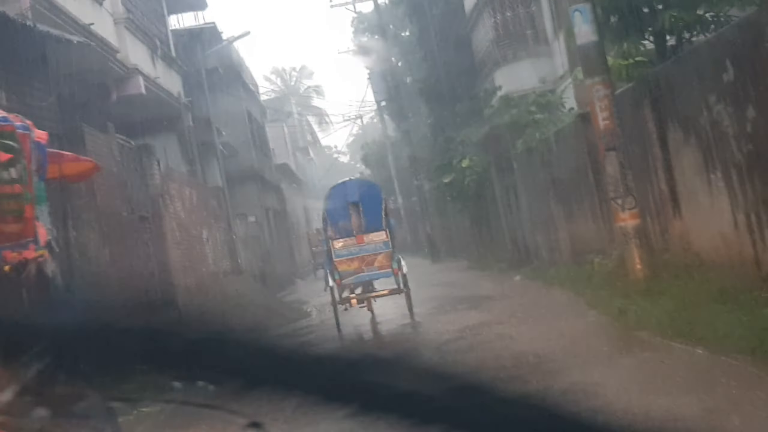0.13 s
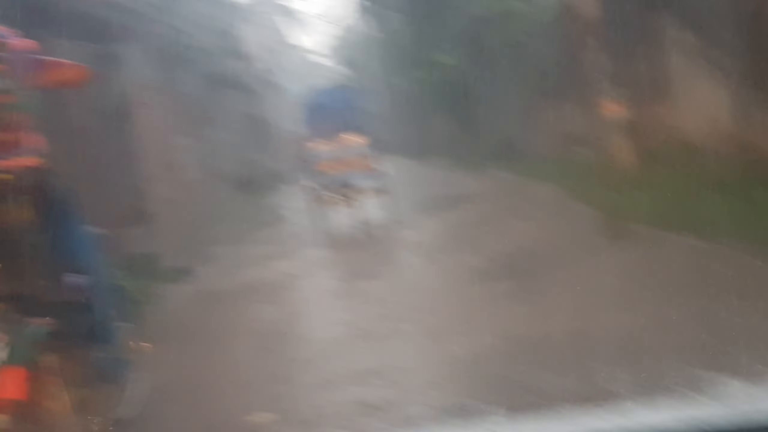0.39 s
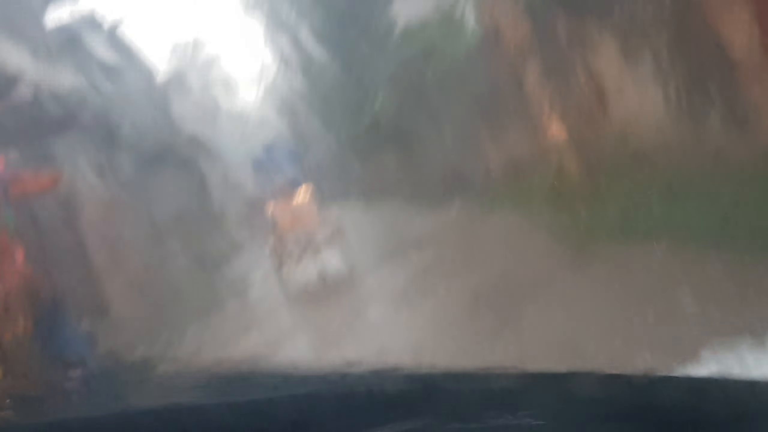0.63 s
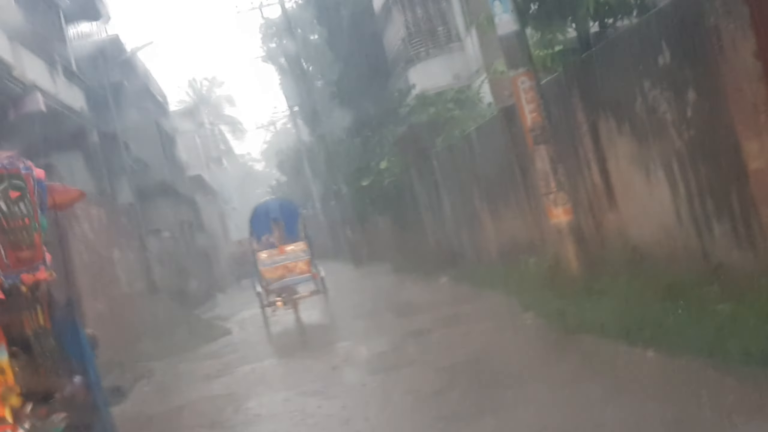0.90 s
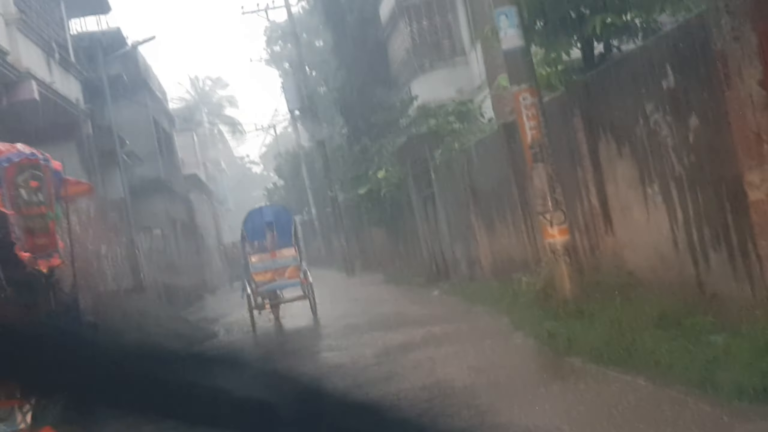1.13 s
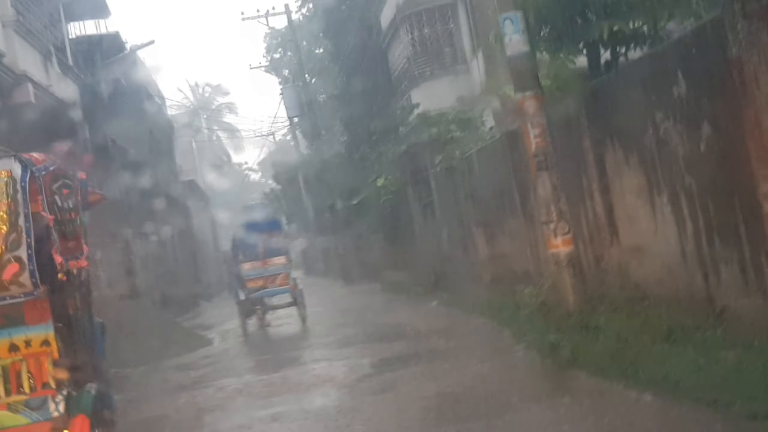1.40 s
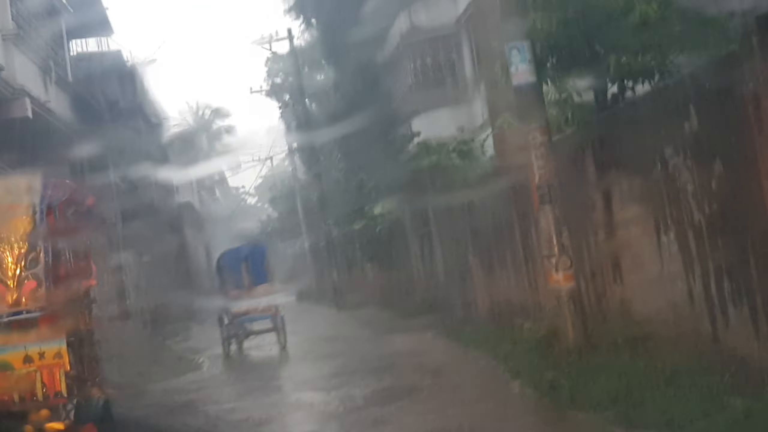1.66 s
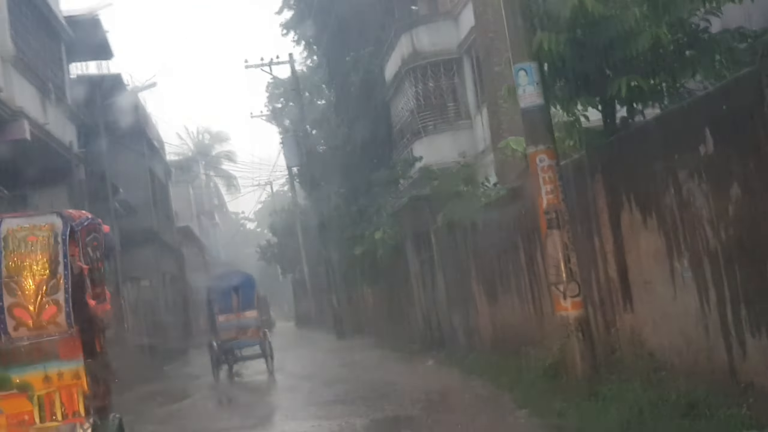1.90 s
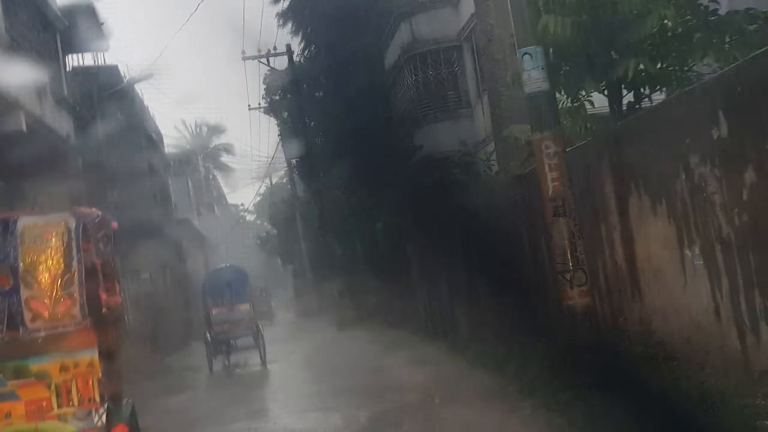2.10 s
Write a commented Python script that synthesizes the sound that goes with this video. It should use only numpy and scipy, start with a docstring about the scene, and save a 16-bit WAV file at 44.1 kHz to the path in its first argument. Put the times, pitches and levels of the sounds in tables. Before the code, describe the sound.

Heard from inside a slowly moving car, heavy rain hisses and patters on the glass and drums on the roof throughout. Deep road rumble swells with bumps. Wipers knock softly about every half second, at first, once with a sharp crack midway. The rain is heaviest just before that, with bright single drops and splashes; then it eases as a low wavering hum and louder road boom come in. The left side is duller, the right brighter.

```python
"""Heavy rain on a slowly rolling car, heard from inside by two unlike microphones.
Throughout: filtered noise and random clicks patter on the glass and drum on the roof; noise-fed modes boom
with the road. Bumps, single drops, splashes and roof strikes fall at set times; from 0.46 s the wipers knock
as they turn (struck panel modes), once with a sharp crack at 3.516 s. The rain peaks between 2 and 3.5 s; a low
gliding sine hums from 3.7 s as the car pulls away, and the road booms louder as the rain eases."""
import sys
import numpy as np
from scipy import signal
from scipy.fft import rfft, irfft, next_fast_len
from scipy.io import wavfile

SR = 44100
rng = np.random.default_rng(int(sys.argv[2]) if len(sys.argv) > 2 else 0)


def master(y):
    """Save y as 16-bit WAV."""
    cut = np.clip(np.atleast_2d(y).T, -1, 1)
    pcm = np.round(cut * 32767)  # scale
    wavfile.write(sys.argv[1], SR, pcm.astype(np.int16))


def ratio_of_db(decibels):
    """Turn decibels (scalar or array-like) into linear amplitude factors; 0 dB maps to 1."""
    return 10 ** (np.asarray(decibels, float) / 20)


N = 302526
SIZE = next_fast_len(N + 8192)
HZ = np.arange(SIZE // 2 + 1) * SR / SIZE + 1e-3

# spectrum of drops on glass: f/Hz, relative level per Hz/dB
GLASS_SPECTRUM = [(410, -20), (700, -7.5), (757, -6.5), (885, -9.5), (1010, -6), (1340, -5.5), (1550, -2.5),
                  (2970, -12), (5700, -13), (6500, -22.5), (7300, -25), (8000, -32), (9000, -28),
                  (12400, -23), (14500, -28), (15700, -34.5)]
# roof panel resonances: f/Hz, width/Hz, level/dB
ROOF_MODES = [(338, 340, 0), (493, 200, 0), (754, 59, 6.5), (950, 290, 0), (1620, 170, -1)]
# left microphone against the right one: f/Hz, level/dB
LEFT_COLOUR = [(50, 0.), (150, -1.5), (300, -1.5), (620, -4), (760, -2.5), (1200, -5), (1700, -9),
               (3000, -7), (5400, -14), (6800, -10.5), (8500, 0), (10500, -5), (12200, -9), (15500, -6)]


def rms_one(x):
    """Scales to unit power."""
    return x / np.sqrt(np.mean(x ** 2) + 1e-20)


def in_time(rows):
    """Interpolates the columns of a curve table to one value per sample."""
    s, *columns = np.transpose(rows)
    return [np.interp(np.arange(N) / SR, s, c) for c in columns]


def at_hz(points):
    """Reads a spectrum table at every frequency, linear in log f."""
    hz, value = np.array(points).T
    return np.interp(np.log(HZ), np.log(hz), value)


def causal(db):
    """Minimum-phase response with this level in dB: nothing sounds before its cause."""
    cepstrum = irfft(np.maximum(db, -90) * np.log(10) / 20, SIZE)
    cepstrum[1:SIZE // 2] *= 2
    cepstrum[SIZE // 2 + 1:] = 0
    return np.exp(rfft(cepstrum))


def drift(corner_hz):
    """Slow random curve of rms 1: noise through two equal poles, at SR / 20."""
    r = np.exp(-40 * np.pi * corner_hz / SR)
    noise = rng.standard_normal(N // 20 + 2002)
    slow = signal.lfilter([1], [1, -2 * r, r * r], noise)[2000:]
    return np.interp(np.arange(N) / 20, np.arange(len(slow)), rms_one(slow))


def resonance(x, hz, width_hz):
    """One resonance with gain 1 on top."""
    r = np.exp(-np.pi * width_hz / SR)
    poles = [1, -2 * r * np.cos(2 * np.pi * hz / SR), r * r]
    return signal.lfilter(np.array([1, 0, -1]) * (1 - r * r) / 2, poles, x)


def wavering_sine(hz, level_db, waver_db, waver_hz, wobble):
    """A near sine whose strength and pitch waver a little."""
    level = np.sqrt(2) * ratio_of_db(level_db + waver_db * drift(waver_hz))
    phase = 2 * np.pi * np.cumsum(hz * (1 + wobble * drift(8.02))) / SR
    return level * np.sin(phase)


def panel_db():
    """The roof panel lifts a few frequencies."""
    return sum(db / (1 + (2 * (HZ - hz) / width_hz) ** 2) for hz, width_hz, db in ROOF_MODES)


def both_ears(shared, left, right, colour_db):
    """Long waves reach both microphones alike, short ones by unrelated paths; power 1 at the right one."""
    # left-right likeness: f/Hz, likeness
    likeness = [(60, 0.97), (130, 0.94), (290, 0.77), (640, 0.52), (1410, -0.06), (3100, 0.06),
                (6820, -0.01), (15000, 0.0)]
    alike = np.clip(at_hz(likeness), 0, 1)
    common = np.sqrt(alike) * rfft(shared, SIZE)
    colour = causal(colour_db)
    pair = []
    for own in (left, right):
        spectrum = common + np.sqrt(1 - alike) * rfft(own, SIZE)
        pair.append(irfft(colour * spectrum, SIZE)[:N])
    return np.array(pair) / np.std(pair[1])


def drops(per_s, spread_db, clump_db):
    """Drops land at random, in clumps, a few much larger than the rest."""
    sizes = ratio_of_db(spread_db * np.minimum(rng.exponential(1, N), 3.6)) * rng.choice([-1, 1], N)
    chance = per_s * ratio_of_db(clump_db * drift(14.0)) / SR
    return sizes * (rng.random(N) < chance)


def cabin(clicks, t60_s, direct_db, pan_db, count):
    """Drops at several places from left to right: a tick and a short cloud of reflections on each path."""
    t = np.arange(2048) / SR
    place = rng.integers(0, count, N)
    paths = 0      # becomes shared, left, right
    for k, side in enumerate(np.linspace(-1, 1, count)):
        clouds = rng.standard_normal((3, len(t))) * ratio_of_db(-60 * t / t60_s)
        clouds = clouds / np.sqrt(np.sum(clouds ** 2, axis=1, keepdims=True))
        tick_db = direct_db + pan_db * side * np.array([0, 1, -1])
        clouds[[0, 1, 2], rng.integers(0, 40, 3)] += ratio_of_db(tick_db)
        paths = paths + signal.oaconvolve((clicks * (place == k))[None], clouds, axes=1)[:, :N]
    return paths


def road_shake():
    """Each bump swells and fades over the steady shake; the deep pitch glides from bump to bump."""
    # lane roughness as steady boom: t/s, level/dB
    road_table = [(0.0, -32.5), (0.6, -31.5), (1.1, -37), (2.2, -40), (2.6, -34), (3.4, -29.5), (3.9, -31),
                  (4.4, -28.5), (5.2, -30.5), (5.7, -27.5), (6.4, -27), (6.86, -33)]
    # bumps in the lane: t/s, deep boom/dB, upper boom/dB, leading deep mode/Hz
    bump_table = [(0.05, -28, -26, 49.3), (0.33, -26, -30, 43), (0.65, -19, -29, 47.14),
                  (1.2, -29, -36, 46.1), (1.76, -27, -37, 46.7), (1.87, -23, -36, 49.6),
                  (2.06, -26, -24, 51.6), (2.2, -28, -40, 51.2), (2.42, -39, -22, 59.9),
                  (2.51, -33, -19, 60.8), (2.85, -33, -43, 44.75), (3.041, -42, -22, 43.6),
                  (3.1, -24.5, -39, 44), (3.2, -15.5, -67, 46.65), (3.4, -35, -25, 45.5),
                  (3.52, -18, -19, 52.8), (3.681, -15.5, -25, 53.04), (3.86, -26, -42, 57.2),
                  (4.18, -21.5, -42, 49.3), (4.6, -21, -36, 47.83), (4.72, -24.5, -28, 51),
                  (4.81, -28, -27, 50.6), (5.13, -24, -31, 39.7), (5.33, -22, -36, 48.8),
                  (5.44, -32, -22.5, 49.3), (5.52, -34, -18.5, 55.4), (5.791, -32, -27, 61.05),
                  (5.88, -40, -41, 61.5), (6.06, -27, -50, 60), (6.459, -29, -17, 55.74),
                  (6.67, -26, -25, 49.7), (6.731, -37, -23, 53.84)]
    rise_s, fall_s = 0.03, 0.03      # amplitude time constants
    steady_deep_db = -2.5            # against the upper boom
    steady_db, = in_time(road_table)
    s, deep_db, upper_db, hz = np.transpose(bump_table)
    t = np.arange(0, N, 40) / SR
    late_s = t[:, None] - s
    swell = np.exp(-2 * np.abs(late_s) / np.where(late_s < 0, rise_s, fall_s))
    levels_db = []
    for base_db, bump_db in ((steady_db + steady_deep_db, deep_db), (steady_db, upper_db)):
        power = np.interp(np.arange(N) / SR, t, swell @ ratio_of_db(2 * bump_db))
        levels_db.append(10 * np.log10(ratio_of_db(2 * base_db) + power))
    return *levels_db, np.interp(np.arange(N) / SR, s, hz)


def boom(modes, level_db):
    """Road shake, as noise, excites low modes of body and cabin."""
    rings = 0
    for hz, width_hz, db in modes:
        ring = resonance(rng.standard_normal(N), hz, 2 * width_hz)
        ring = rms_one(resonance(ring, hz, width_hz))
        rings = rings + ratio_of_db(db + 1.2 * drift(2.3)) * ring
    return ratio_of_db(level_db) * rms_one(rings)


def road():
    """Deep and upper modes boom, one deep mode leading at a time; opposite parts left and right."""
    # modes of body and cabin: f/Hz, width/Hz, relative level/dB
    deep_modes = [(34, 5.6, -10), (53.4, 17, -6.5)]
    # higher modes: f/Hz, width/Hz, relative level/dB
    upper_modes = [(74.5, 15.3, 2), (92.8, 35.5, -3.5), (114.4, 59, -5.5)]
    deep_db, upper_db, deep_hz = road_shake()
    deep = wavering_sine(deep_hz, deep_db - 3.5, waver_db=-1.0, waver_hz=6.3, wobble=0.0834)
    deep = deep + boom(deep_modes, deep_db + 0.5)
    # the boom differs a little across the cabin
    unlike = boom(deep_modes, deep_db - 28) + boom(upper_modes, upper_db - 23.0)
    return deep + boom(upper_modes, upper_db) + unlike * [[1], [-1]]


def pull_away_hum():
    """A low wavering sine that fades in and glides about as the car pulls away."""
    # hum: t/s, f/Hz, level/dB
    hum_table = [(3.9, 79.5, -35), (4.2, 97.4, -33.5), (4.54, 109.2, -24.5), (4.9, 102.7, -35.5),
                 (5.12, 108.6, -30.5), (5.25, 91, -22), (5.5, 72.47, -42), (6.08, 71.9, -34),
                 (6.4, 84.55, -31), (6.7, 85.9, -32), (6.86, 78.7, -28.5)]
    fade_in = np.clip((np.arange(N) / SR - hum_table[0][0]) / 0.22 + 1, 0, 1)
    return fade_in * wavering_sine(*in_time(hum_table), waver_db=2.5, waver_hz=19.0, wobble=0.0617)


def wipers():
    """Each turn is a soft blow on the panel below the screen, shared out differently among its modes."""
    # arms turning round: t/s, strength/dB for each of the four mode groups
    knock_table = [(0.458, -51, -17.5, -15, -26.5), (1.019, -29, -36, -31, -29.5),
                   (1.495, -40, -17.5, -16, -18.5), (2.035, -20, -41, -47, -24.5),
                   (2.496, -16, -21.5, -27, -25), (3.029, -34, -46, -35, -28), (3.479, -16, -20, -33, -40),
                   (3.5127, -24, -16.5, -21, -25), (4.02, -39, -45, -29, -39),
                   (4.515, -24, -20.5, -18.5, -23), (5.492, -30, -39, -26, -27.5),
                   (5.521, -24, -37, -35, -18.5), (6.53, -14, -20.5, -18, -21)]
    # panel below the screen, four mode groups, each with rows: f/Hz, level/dB, t60/s
    scuttle_modes = [
        [(103.3, 1.5, 0.15)],
        [(127, 1, .14), (162, 5.5, 0.11)],
        [(197.6, 3, 0.051), (237, 4, 0.052)],
        [(310.7, 6, 0.08), (439, 2, 0.04), (746, -7, 0.034)],
    ]
    slack_s, slack_db = 0.00422, -13.5
    judder_s, judder_db = 0.01537, -10.5
    contact_s = 0.0018
    s, *levels_db = np.transpose(knock_table)
    out = np.zeros(N)
    for modes, level_db in zip(scuttle_modes, levels_db):
        blows = np.full(N, 1e-18)
        blows[np.round(s * SR).astype(int)] = -ratio_of_db(level_db)
        # the linkage takes up its slack just before
        blows -= ratio_of_db(slack_db) * np.roll(blows, -round(slack_s * SR))
        # and earlier the blade judders to a stop
        blows += ratio_of_db(judder_db) * np.roll(blows, -round(judder_s * SR))
        for hz, db, t60_s in modes:
            r, w = ratio_of_db(-60 / (t60_s * SR)), 2 * np.pi * hz / SR
            out += signal.lfilter([0, ratio_of_db(db) * np.sin(w)], [1, -2 * r * np.cos(w), r * r], blows)
    push = np.hanning(round(contact_s * SR))      # rubber softens the contact
    soft = np.convolve(out, push / push.sum())[:N]
    return signal.sosfilt(signal.butter(4, 80, "high", fs=SR, output="sos"), soft)


def drumming(level_db):
    """Heavy drops drum on the roof panel over the blur of many more."""
    # roof drumming spectrum: f/Hz, relative level per Hz/dB
    drum_spectrum = [(65, -38.5), (110, -3.5), (238, -10.5), (317, -8.5), (446, -8.5), (646, -14),
                     (758, -16), (898, -17.5), (1200, -17), (1560, -56.5), (2640, -120)]
    near = drops(1500, spread_db=2.5, clump_db=2.5)
    near = rms_one(cabin(near, t60_s=0.031, direct_db=-0.5, pan_db=2.0, count=8))
    paths = ratio_of_db(-2.5) * near + rng.standard_normal((3, N))
    return ratio_of_db(level_db) * both_ears(*paths, at_hz(drum_spectrum) + panel_db())


def thuds_and_crack():
    """Each blow excites the same modes with strengths of its own; mode heights fall with pitch."""
    # heavy drops on the roof, and at 3.516 s the sharp crack of a wiper knock: t/s, strength/dB
    blow_table = [(0.775, -22), (1.18, -24), (1.569, -16), (1.609, -34), (1.653, -23), (1.883, -20),
                  (2.255, -21), (2.344, -34), (2.45, -18), (2.631, -28), (2.92, -21), (3.213, -35),
                  (3.5157, -13.5), (5.76, -26), (5.777, -21.5), (5.825, -23.5), (6.055, -31), (6.145, -21),
                  (6.19, -21)]
    tail_s, tail_db = 0.0087, -15.0      # a fading spatter follows each blow
    s, strength_db = np.transpose(blow_table)
    chance_db = rng.normal(0, 1.56, (len(s), 2 * len(ROOF_MODES)))
    out = np.zeros((2, N))
    for k, (hz, width_hz, db) in enumerate(ROOF_MODES):
        blow_db = strength_db + db - 12.5 - 5.1 * np.log2(hz / 500) + chance_db[:, 2 * k:2 * k + 2].T
        blows = np.full((2, N), 1e-18)
        blows[:, np.round(s * SR).astype(int)] = ratio_of_db(blow_db)
        tail = signal.lfilter([0, 1], [1, -np.exp(-1 / (tail_s * SR))], blows)
        blows += ratio_of_db(tail_db) * rng.standard_normal((2, N)) * tail
        # a unit blow rings with height 1
        out += resonance(blows, hz, width_hz) * SR / (2 * np.pi * width_hz)
    return out


def patter(level_db):
    """Near drops on the glass over the blur of all the far ones."""
    near = drops(1100, spread_db=6.5, clump_db=3.0)
    near = cabin(near, t60_s=0.012, direct_db=-8.5, pan_db=12.5, count=6)
    near = signal.lfilter([1, -.7], [1], near)      # small drops are mostly treble
    blur = rng.standard_normal((3, N)) * ratio_of_db(1.22 * drift(20.0))
    paths = ratio_of_db(-2.5) * rms_one(near) + blur
    return ratio_of_db(level_db) * both_ears(*paths, at_hz(GLASS_SPECTRUM) + panel_db())


def splashes():
    """Sheets of spray slap the glass: noise bursts with a quick rise, unrelated at the two microphones."""
    # splashes: t/s, strength/dB
    splash_table = [(0.529, -23), (0.766, -36), (1.5594, -19), (1.571, -24), (1.8472, -37), (2.027, -24),
                    (2.12, -26), (2.16, -25), (2.26, -22), (2.415, -32), (2.572, -21), (2.614, -26),
                    (2.7067, -23), (2.787, -32), (2.848, -21), (2.994, -19.5), (3.084, -25), (3.268, -19),
                    (3.352, -23), (3.5108, -33), (3.649, -33), (3.807, -31), (4.4892, -24.5), (4.918, -32),
                    (4.96, -25), (5.385, -25), (5.52, -22), (6.0396, -24), (6.185, -27), (6.478, -23),
                    (6.788, -25)]
    rise_s, fall_s = 0.00048, 0.012
    t = np.arange(4096) / SR
    shape = (1 - np.exp(-t / rise_s)) * np.exp(-t / fall_s)
    envelope = np.zeros(N + len(t))
    for s, strength_db in splash_table:
        envelope[round(s * SR):][:len(t)] += ratio_of_db(strength_db - 5.5) * shape
    colour = causal(at_hz(GLASS_SPECTRUM) + 2.44 * np.log2(HZ / 5000))
    colour = colour / np.sqrt(np.mean(np.abs(colour) ** 2))
    bursts = envelope[:N] * rng.standard_normal((2, N))
    return irfft(colour * rfft(bursts, SIZE), SIZE)[:, :N]


def big_drops():
    """Single drops near the microphones: a sharp bright tick, then a faint spatter of droplets."""
    # big drops on the glass: t/s, left tick peak/dB, right tick peak/dB
    drop_table = [(0.155, -39, -16), (0.5244, -52, -21), (0.5315, -21, -42), (0.7362, -43, -19),
                  (0.8629, -42, -28), (1.572, -35, -24), (1.7576, -34, -35), (2.0285, -35, -16),
                  (2.114, -12, -16), (2.1258, -24, -31), (2.1366, -42, -26), (2.22, -38, -12),
                  (2.286, -16, -23), (2.479, -16, -17), (2.5727, -26, -35), (2.7134, -34, -26),
                  (2.7442, -33, -11), (2.9174, -31, -16), (2.9314, -43, -19), (3.054, -40, -14),
                  (3.1404, -44, -24), (3.2263, -20, -34), (3.364, -22, -7), (3.832, -22, -18),
                  (4.295, -34, -18), (4.832, -41, -20), (4.9213, -30, -20), (5.0508, -37, -20),
                  (5.1282, -32, -22), (5.1397, -35, -15), (5.3461, -35, -19), (5.47, -40, -16),
                  (5.5726, -22, -14), (5.5978, -35, -17), (5.721, -30, -21), (6.481, -36, -18),
                  (6.6244, -30, -20), (6.7902, -37, -25)]
    spatter_s, spatter_db = 0.002, -18
    s, *peaks_db = np.transpose(drop_table)
    ticks = np.zeros((2, N))
    ticks[:, np.round(s * SR).astype(int)] = ratio_of_db(np.array(peaks_db))
    tail = signal.lfilter([0, 1], [1, -np.exp(-1 / (spatter_s * SR))], ticks)
    spatter = ratio_of_db(spatter_db) * rng.standard_normal((2, N)) * tail
    colour = causal(at_hz(GLASS_SPECTRUM) + 6.4 * np.log2(HZ / 5000))
    # unit peak as each microphone hears it
    microphones = (causal(at_hz(LEFT_COLOUR)), 1)
    peaks = [np.max(np.abs(irfft(colour * mic, SIZE))) for mic in microphones]
    return irfft(colour * rfft(ticks + spatter, SIZE), SIZE)[:, :N] / np.reshape(peaks, (2, 1))


def rain():
    """Patter and drumming follow the downpour and its quick gusts; splashes and big drops stand out."""
    # strength of the downpour: t/s, strength/dB
    rain_table = [(0.0, -41), (0.38, -40), (0.86, -41.5), (2.27, -38.5), (2.41, -40), (3.23, -37.5),
                  (4.05, -39), (4.26, -41.5), (4.74, -43), (5.46, -41.5), (5.69, -43.5), (6.46, -41.5),
                  (6.86, -42.5)]
    patter_over_strength_db, patter_gust_db = 8, 0.52
    drumming_mean_db, drumming_gust_db = -31.5, 1
    drumming_follows = 0.79      # share of the swing in strength
    strength_db, = in_time(rain_table)
    gusts = drift(7.1)
    patter_db = strength_db + patter_over_strength_db + patter_gust_db * gusts
    swing_db = strength_db - strength_db.mean()
    drumming_db = drumming_mean_db + drumming_follows * swing_db + drumming_gust_db * gusts
    return drumming(drumming_db) + patter(patter_db) + splashes() + big_drops()


def scene():
    """Road, hum and wipers through the body, rain all round."""
    return road() + pull_away_hum() + wipers() + thuds_and_crack() + rain()


def low_pass(x):
    """Removes everything above the highest recorded frequency."""
    return signal.sosfilt(signal.butter(12, 16510, fs=SR, output="sos"), x)


def record(dry):
    """The left microphone is duller than the right; the very top and the deepest bass are cut."""
    top_hz, bass_cut_hz = 15780, 28
    left = irfft(causal(at_hz(LEFT_COLOUR)) * rfft(dry[0], SIZE), SIZE)[:N]
    response = ratio_of_db(-22 * (HZ > top_hz)) / np.sqrt(1 + (bass_cut_hz / HZ) ** 6)
    mix = irfft(response * rfft([left, dry[1]], SIZE), SIZE)[:, :N]
    return low_pass(mix)


dry = scene()
out = record(dry)
master(out)
```